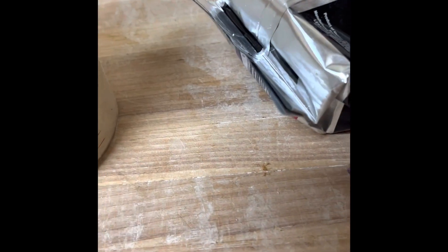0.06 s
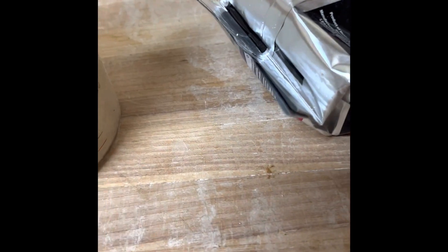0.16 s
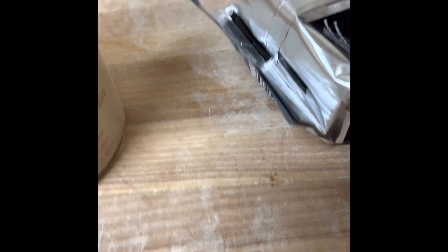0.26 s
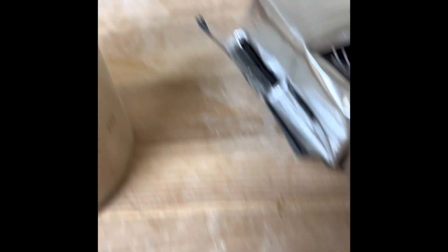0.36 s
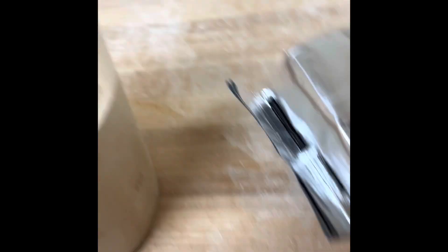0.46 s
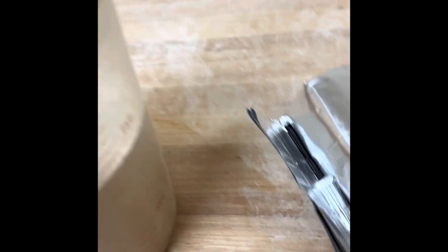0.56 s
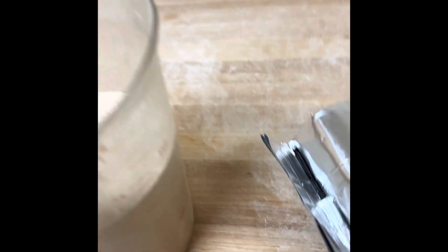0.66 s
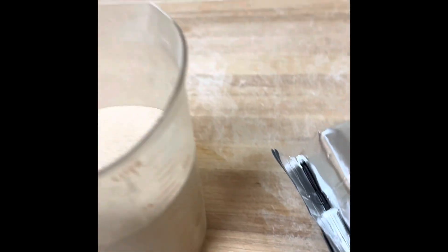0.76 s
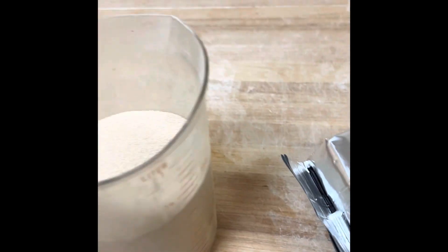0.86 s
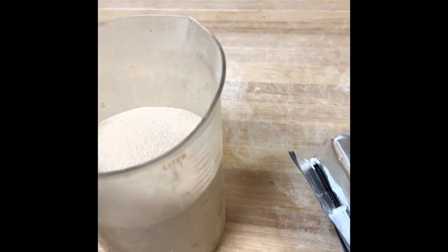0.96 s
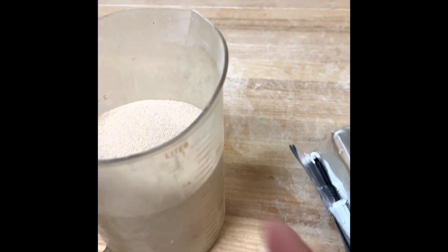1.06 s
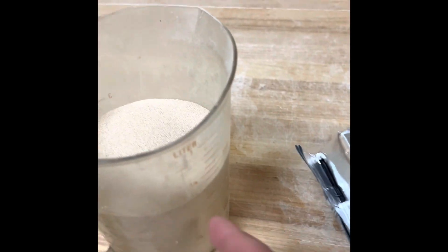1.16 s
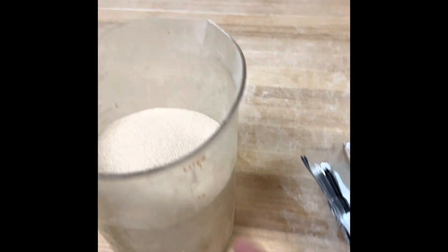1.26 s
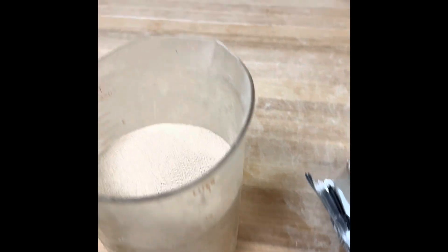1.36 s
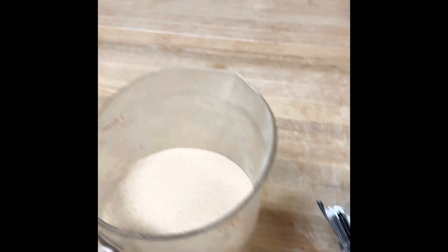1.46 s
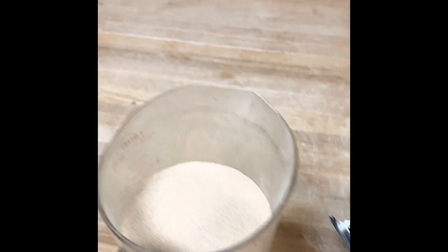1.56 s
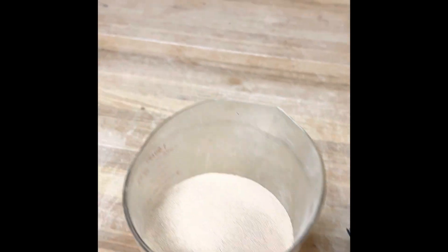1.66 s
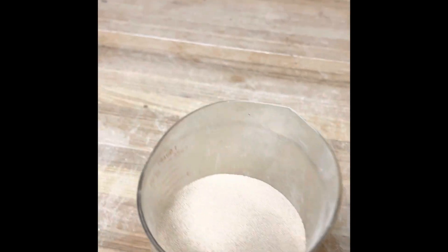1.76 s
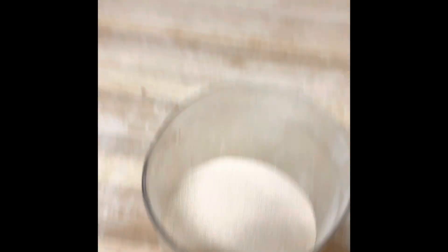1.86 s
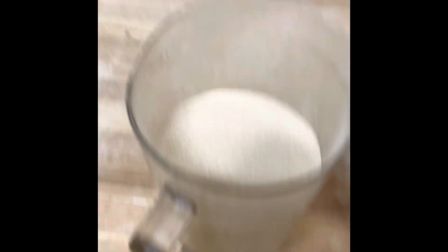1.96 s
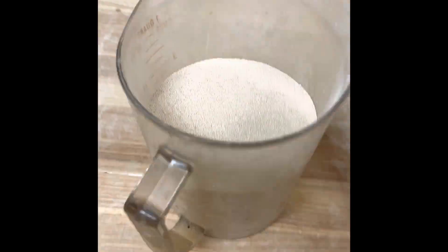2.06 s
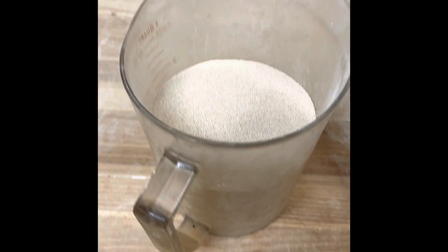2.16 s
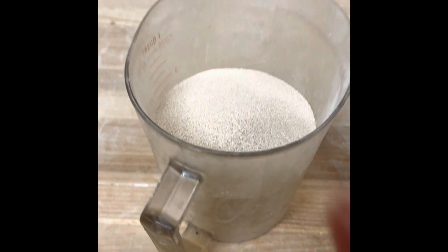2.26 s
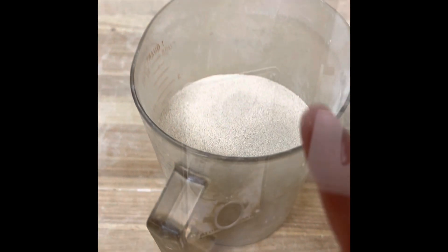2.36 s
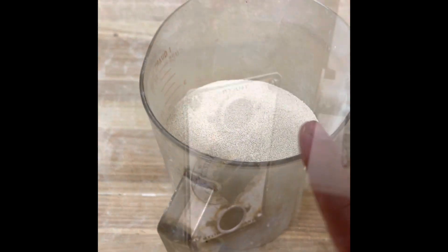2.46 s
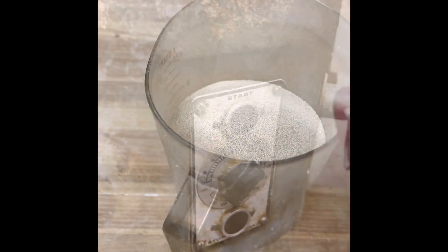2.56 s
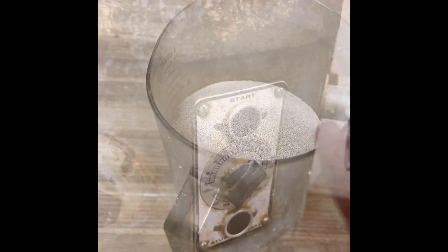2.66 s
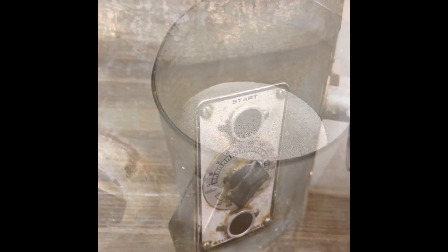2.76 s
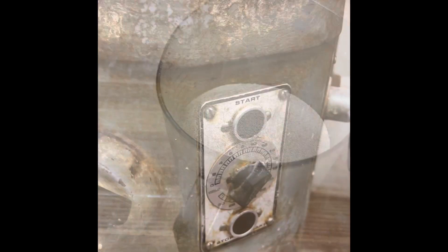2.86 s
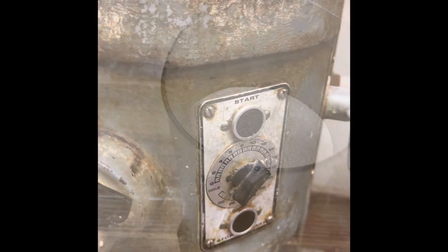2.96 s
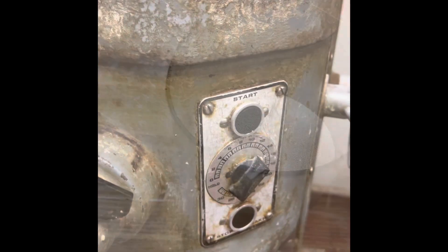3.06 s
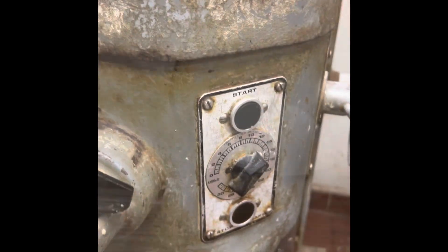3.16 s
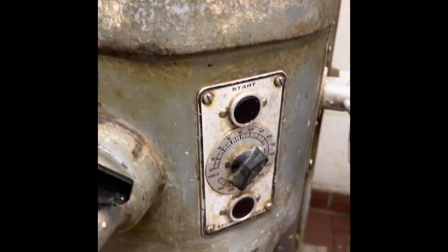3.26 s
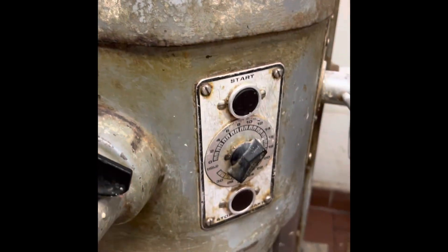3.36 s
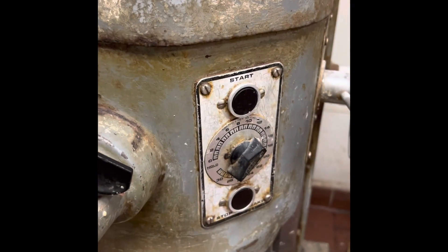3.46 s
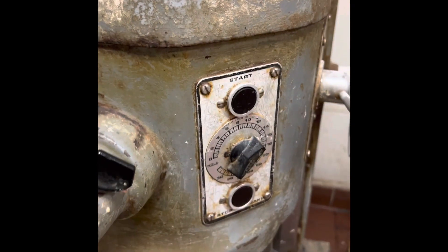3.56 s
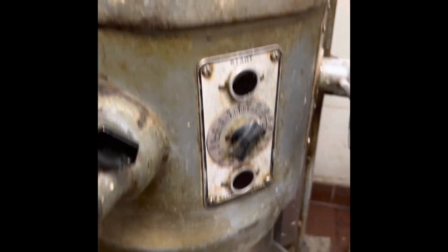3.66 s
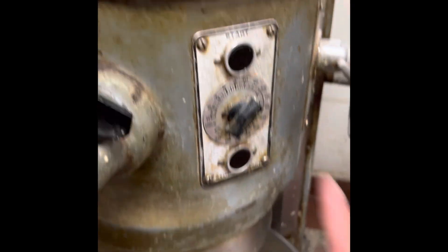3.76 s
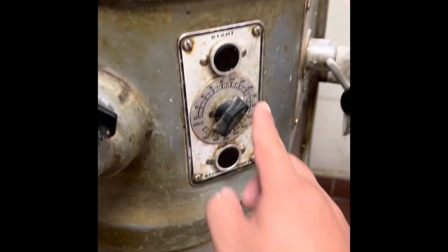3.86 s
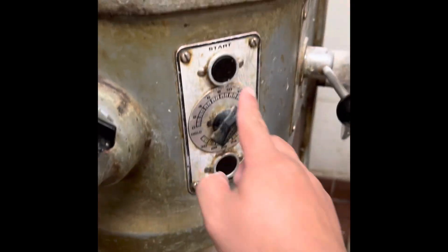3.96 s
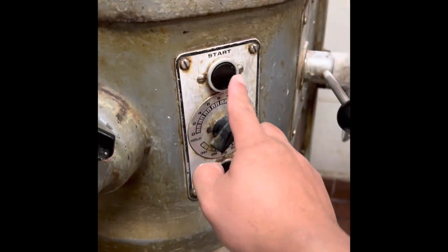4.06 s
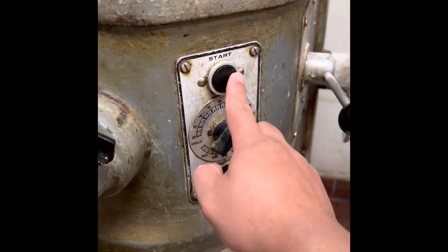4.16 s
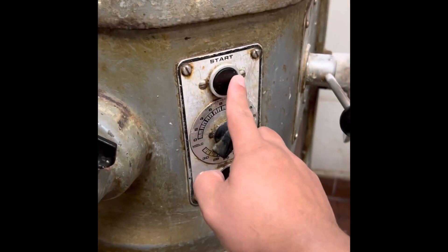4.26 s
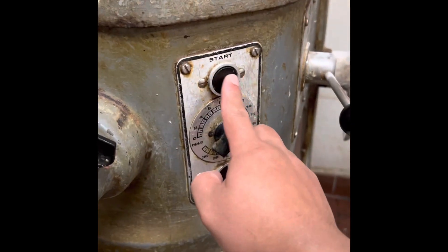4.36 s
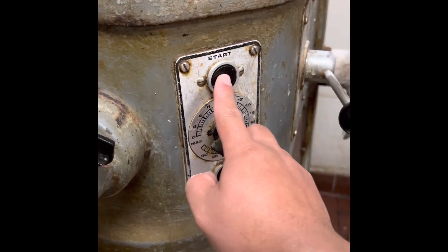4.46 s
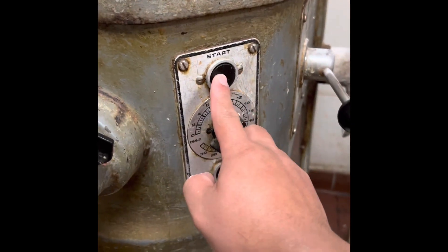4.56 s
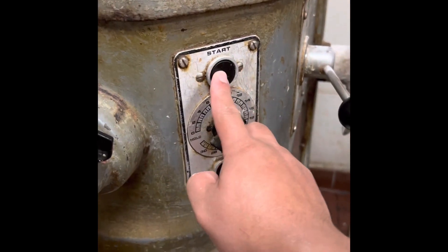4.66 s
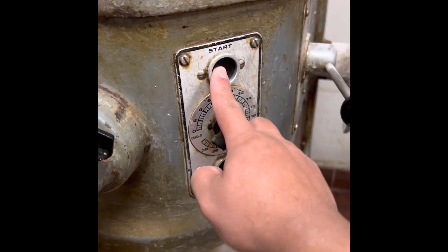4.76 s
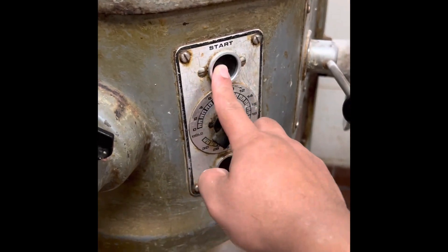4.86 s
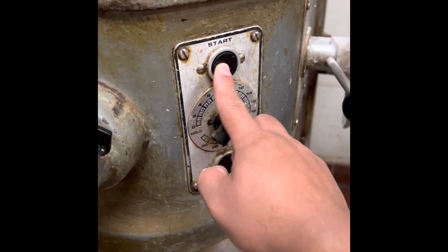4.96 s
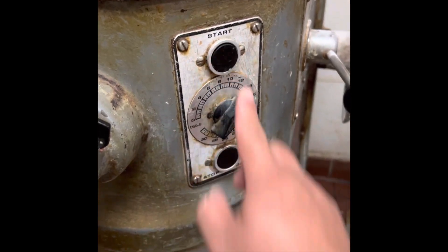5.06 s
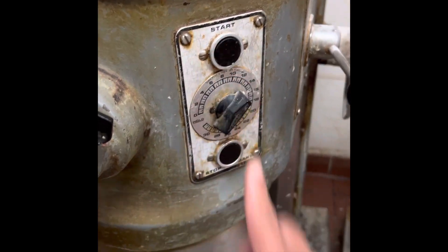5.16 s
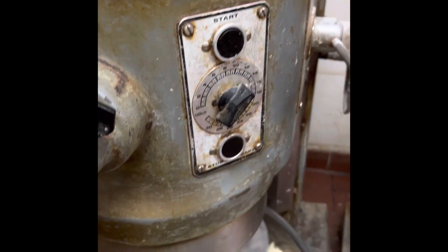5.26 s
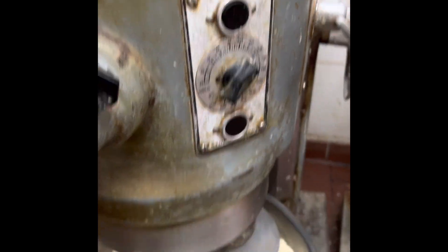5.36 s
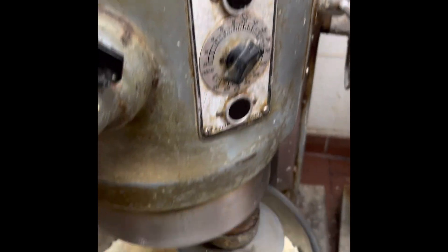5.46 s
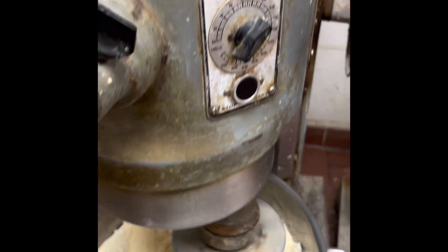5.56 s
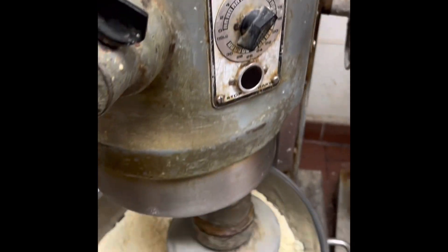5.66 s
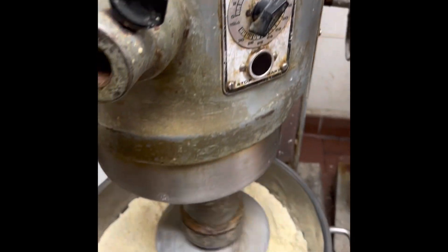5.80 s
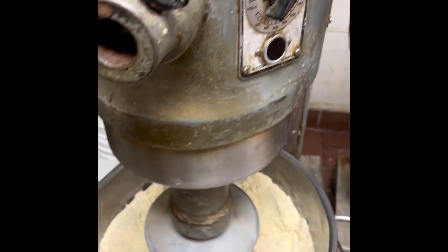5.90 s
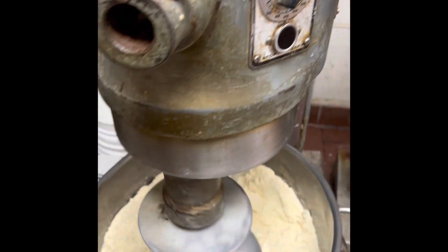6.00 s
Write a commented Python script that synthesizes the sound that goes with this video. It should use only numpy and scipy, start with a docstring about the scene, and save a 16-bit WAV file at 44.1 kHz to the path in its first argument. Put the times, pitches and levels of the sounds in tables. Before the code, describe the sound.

A quiet, steady hum of kitchen appliances and vent air carries one light wooden knock, very faint high squeaks and some far ticks. Then, close by, a start button is pressed and a big dough mixer cracks on, steel against steel. The motor surges with a ringing shudder, a switch clicks, and the gears ease into a rumble that swells with each turn of the beater.

```python
"""A bakery kitchen hums with fridges and fans, first heard at a wooden counter that takes one knock.
Thin squeaks and distant ticks pass as the sound fades to a place beside a large floor mixer.
A finger presses the start button: the contactor cracks and the motor shudders up to speed while
the resonances of the cast frame ring. The starting switch clicks, and the gears settle to a rumble
that heaves with each turn of the beater."""
import sys
import numpy as np
from scipy import signal
from scipy.fft import rfft, irfft, next_fast_len
from scipy.io import wavfile
from scipy.ndimage import uniform_filter1d

SR = 44100
rng = np.random.default_rng(int(sys.argv[2]) if len(sys.argv) > 2 else 0)


def materialize(psi):
    """Save the field psi as 16-bit PCM at rate SR to the path in sys.argv[1].

    A 1-D psi becomes a single channel; in a 2-D psi each row is a channel.
    """
    bounded = np.clip(np.atleast_2d(psi).T, -1, 1)
    quanta = np.round(bounded * 32767).astype(np.int16)
    wavfile.write(sys.argv[1], SR, quanta)


N = 265905
T = np.arange(N) / SR


def amp(db):
    """Decibels to gain."""
    return 10 ** (np.asarray(db) / 20)

def unit_rms(x):
    """Scales to rms 1."""
    return x / np.sqrt(np.mean(x ** 2) + 1e-20)

def curve(points, hz):
    """Reads a table on a log-frequency axis."""
    f, value = np.transpose(points)
    return np.interp(np.log(hz + 1), np.log(f + 1), value)

def add(mix, s, sound):
    """Mixes a sound in at s seconds."""
    part = mix[:, round(s * SR):][:, :sound.shape[1]]
    part += sound[:, :part.shape[1]]

def wander(t, top_hz):
    """Random drift of rms about 1: twelve sines up to top_hz."""
    hz, phase = np.geomspace(top_hz / 12, top_hz, num=12), rng.random(12)
    knots = np.arange(t[0], t[-1] + .01, .005)
    drift = np.sin(2 * np.pi * (knots[:, None] * hz + phase)).sum(1) / np.sqrt(6)
    return np.interp(t, knots, drift)

def noise(size, spectrum, patchy_db=0., frame=1024):
    """Two unrelated noises of one colour, rms 1, with drifting louder and softer patches."""
    re, im, patches = rng.standard_normal((3, 2, frame // 2 + 1, 4 * size // frame + 5))
    patches = uniform_filter1d(patches[0], 8, 0)
    patches = unit_rms(uniform_filter1d(patches, 12288 // frame, 1))
    colour_db = curve(spectrum, np.fft.rfftfreq(frame, 1 / SR))[:, None]
    bins = (re + 1j * im) * amp(colour_db + patchy_db * patches)
    return unit_rms(signal.istft(bins, nperseg=frame, noverlap=3 * frame // 4)[1][:, :size])

def band(size, hz, width):
    """Two unrelated noises ringing in one resonance, steady or moving."""
    pole = np.exp(-np.pi * width / SR)
    white = rng.standard_normal((2, 2, size + 4000))
    re, im = signal.lfilter([1], [1, -2 * pole, pole * pole], white)[..., 4000:]
    phase = 2 * np.pi * np.cumsum(hz * np.ones(size)) / SR
    return unit_rms(re * np.cos(phase) + im * np.sin(phase))

def tone(t, hz, db, slip):
    """A sine and cosine whose phase drifts by about slip radians."""
    phase = 2 * np.pi * (hz * t + rng.random()) + slip * wander(t, 4.)
    return np.sqrt(2) * amp(db) * np.array([np.sin(phase), np.cos(phase)])

def burst(db, hz, t60, width):
    """A short hit of pitched noise; the higher it is, the brighter its edge."""
    t = np.arange(SR // 8) / SR
    edge = amp(-24) * hz / 4000 * np.diff(rng.standard_normal((2, len(t) + 1)))
    envelope = amp(db - 60 * t / t60) * (1 - np.exp(-t / .00055))
    return envelope * (band(len(t), hz, width) + edge)

def bell(x, centre, width):
    """A Gaussian hump of height 1."""
    return np.exp(-((x - centre) / width) ** 2 / 2)

def swell(t, peak_s, rise, t60):
    """A bell-shaped rise to the peak, then free ringing."""
    return np.where(t < peak_s, bell(t, peak_s, rise), amp(-60 * np.maximum(t - peak_s, 0) / t60))


# Room tone at the counter and by the mixer (frequency [Hz], relative density [dB])
COUNTER_AIR = [(15, -45), (30, -26.5), (55, -8), (90, -6), (118, -2.5), (150, -5.5), (195, -10.5),
               (240, -4), (300, -9.5), (335, -16), (430, -10.5), (520, -19.5), (750, -23.5), (1050, -31),
               (1400, -32), (2400, -91.5)]
MIXER_SIDE_AIR = [(15, -37), (30, -18.5), (50, -9.5), (85, -8.5), (128, -0.5), (185, -5.5), (260, -3),
                  (320, -9), (420, -10), (600, -17), (830, -18), (1000, -26.5), (1400, -27), (2400, -90)]
def room_tone(near):
    """The low bed of air and machines; near is 0 at the counter and 1 by the mixer."""
    counter = amp(-45) * noise(N, COUNTER_AIR, patchy_db=.8, frame=4096)
    by_mixer = amp(-46.5) * noise(N, MIXER_SIDE_AIR, patchy_db=2.2, frame=4096)
    return (1 - near) * counter + near * by_mixer

# Fader moves of two fans (time [s], lower fan level [dB], upper fan level [dB])
FAN_LEVELS = [(0.0, -78, -80), (0.7, -74, -74), (1.3, -69, -64), (2.45, -65, -60.5), (2.68, -74, -73),
              (2.85, -62, -65), (3.27, -58.5, -57), (4.2, -61, -61), (4.7, -57, -58)]
def beating_fans():
    """Two fan tones, close in pitch, beat against each other."""
    times, lower_db, upper_db = np.transpose(FAN_LEVELS)
    lower = tone(T, hz=826, db=np.interp(T, times, lower_db), slip=.3)
    upper = tone(T, hz=846, db=np.interp(T, times, upper_db), slip=.3)
    return lower + upper

# Broad humps of the vent hiss (frequency [Hz], relative density [dB])
VENT_COLOUR = [(650, -33.5), (1100, -10), (1470, -10.5), (1590, -3.5), (1690, -5), (2340, -7), (2910, -6),
               (3800, -12), (4440, -10.5), (5790, -19), (6540, -10.5), (9110, -29), (10900, -34),
               (12600, -26), (15500, -50.5)]
def vent_hiss(near):
    """Air hisses from a vent, a little louder by the mixer."""
    level = np.hypot((1 - near) * amp(-64.5), near * amp(-62.8))
    return level * noise(N, VENT_COLOUR, patchy_db=.9)

# Hum partials (pitch [Hz], level at the counter [dB], level by the mixer [dB], waver [dB])
HUM_PARTIALS = [(119.6, -51, -58.5, 3.5), (169.1, -42.5, -53.5, 1), (214, -53.5, -57, 1.5),
                (294, -58, -56, 3.5), (356.6, -61, -66.5, 3.5), (445, -66, -71, 4), (569, -67.5, -74.5, 7),
                (672, -74, -71, -2), (964.9, -73.5, -85, 6), (1138, -80.5, -74.5, 4),
                (1534, -78.5, -81, -4.5), (1587, -88, -72, 5), (1850, -78.5, -85, 4.5),
                (2882, -78, -78, -1), (2968, -85, -74, 5), (3140, -80.5, -84, -3), (3323, -80.5, -80, 6),
                (4450, -90, -81, 3), (5300, -88, -82.5, 3), (6280, -79.5, -80, 2), (6840, -86.5, -86, 6.5),
                (7640, -93.5, -91, 1.5)]
def appliance_hum(near):
    """Fridges and fans hold wavering tones; the higher ones blur into fuzz."""
    out = np.zeros((2, N))
    for hz, counter_db, near_db, waver_db in HUM_PARTIALS:
        level = np.hypot((1 - near) * amp(counter_db), near * amp(near_db))
        fuzz = np.clip(hz / 9000, 0, .3)
        clean = tone(T, hz, waver_db * np.tanh(wander(T, 5.)), slip=.33 + hz / 900)
        out += level * (np.sqrt(1 - fuzz) * clean + np.sqrt(fuzz) * band(N, hz, hz / 150))
    return out

# Soft rustles (start [s], length [s], level [dB], pitch [Hz], width [Hz])
SOFT_RUSTLES = [(.64, .13, -75, 11000, 9000), (3.17, .4, -71, 4400, 900)]
def rustles():
    """High noise flutters in and out."""
    out = np.zeros((2, N))
    for s, length, db, hz, width in SOFT_RUSTLES:
        t = np.arange(0, length, 1 / SR)
        envelope = amp(db + 3.5 * wander(t, 40.)) * np.hanning(len(t))
        add(out, s, envelope * band(len(t), hz, width))
    return out

# Thin squeaks (start [s], length [s], first pitch [Hz], last pitch [Hz], arch [Hz], level [dB])
THIN_SQUEAKS = [(1.37, .115, 11400, 11950, 650, -82), (1.55, .055, 12200, 12700, 100, -71),
                (1.66, .13, 11450, 11750, 680, -69), (3.0, .06, 12600, 12500, 60, -71),
                (3.285, .08, 12200, 12100, 40, -73), (3.36, .09, 12300, 13000, 120, -71)]
def squeaks():
    """Very high sines glide along an arch, loudest in the middle."""
    out = np.zeros((2, N))
    for s, length, first_hz, last_hz, arch_hz, db in THIN_SQUEAKS:
        t = np.arange(0, length, 1 / SR)
        arch = np.sin(np.pi * t / length)
        hz = first_hz + (last_hz - first_hz) * t / length + arch_hz * arch
        cycles = np.cumsum(hz) / SR + .2 * wander(t, 90.)
        envelope = amp(db - 16 * (1 - arch)) * signal.windows.tukey(len(t), .3)
        squeak = envelope * np.sin(2 * np.pi * cycles)
        add(out, s, np.array([squeak, squeak]))
    return out

# Distant ticks (time [s], level [dB], pitch [Hz])
FAR_TICKS = [(2.417, -49, 4140), (2.427, -63, 3960), (2.472, -54.5, 4100), (2.492, -64, 4180),
             (2.604, -60, 4120), (2.661, -50.5, 4100)]
def ticks():
    """Each tick rings briefly under a shorter, softer overtone."""
    out = np.zeros((2, N))
    for s, db, hz in FAR_TICKS:
        add(out, s, burst(db, hz, t60=.06, width=350))
        add(out, s, burst(db - 11, 1.43 * hz, t60=.03, width=350))
    return out

# Modes of the wooden counter (level [dB], pitch [Hz], t60 [s], width [Hz])
WOOD_MODES = [(-44, 431, .1, 200), (-47, 875, .12, 89), (-49, 1400, .058, 800)]
def counter_knock(at_s=.825):
    """One knock sets the damped modes of the wood ringing."""
    out = np.zeros((2, N))
    for mode in WOOD_MODES:
        add(out, at_s, burst(*mode))
    return out

# Clicks of the start button (time [s], level [dB], pitch [Hz], width [Hz])
BUTTON_CLICKS = [(4.14, -60, 5500, 900), (4.657, -42, 1680, 2500), (4.701, -46.5, 4600, 900),
                 (4.712, -56, 4540, 900), (4.722, -39, 2960, 5000), (4.728, -32.5, 1770, 2500),
                 (4.734, -32.5, 2310, 5000)]
def start_button():
    """A finger touches the button, then pushes it home."""
    out = np.zeros((2, N))
    for s, db, hz, width in BUTTON_CLICKS:
        add(out, s, burst(db, hz, t60=.035, width=width))
    return out

# Reverb time of the kitchen (frequency [Hz], t60 [s])
ROOM_DECAY = [(1000, 0.86), (3000, 1.08), (8000, 0.7), (15000, 0.43)]
def room_tail(colour):
    """One second of noise reverb; the room keeps each band for its own time."""
    hz, times, bins = signal.stft(noise(SR, colour), SR, nperseg=256)
    decay = amp(-60 * times / curve(ROOM_DECAY, hz)[:, None])
    return signal.istft(bins * decay, SR, nperseg=256)[1][:, :SR]

# One contactor hit, then three of the switch (time [s], level [dB], t60 [s], reverb send [dB])
METAL_HITS = [(4.7457, -13, 0.17, -18), (4.955, -48, .04, -20), (4.986, -36, 0.18, -14),
              (5.008, -42, .12, -16)]
# Colours of those hits (frequency [Hz], relative density [dB])
CONTACTOR_COLOUR = [(410, -38), (700, -6.5), (961, -13), (1360, -16.5), (1720, -1.5), (1840, -7),
                    (2690, -4), (3030, -11), (4000, -7), (4390, -10), (7160, -5), (10400, -12),
                    (14200, -14.5), (15800, -20), (16500, -39)]
SWITCH_COLOUR = [(1530, -26), (2600, 0), (3290, -14), (3580, -11), (3860, -9), (6780, -14), (8010, -2),
                 (8780, -15), (12400, -13.5), (16000, -26)]
# Ringing steel of the contactor (pitch [Hz], level [dB], t60 [s])
STEEL_MODES = [(2140, -36, .3), (3890, -37, .3), (4950, -39, .3), (6680, -39, .25), (6990, -39, .25),
               (7540, -37, .25)]
def contactor_and_switch():
    """Steel slams on steel as the contactor closes; then the starting switch lets go."""
    out, t = np.zeros((2, N)), np.arange(SR) / SR
    snap = (1 - np.exp(-t / .0007)) * (1 + .86 * np.exp(-t / .0015))
    for (s, db, t60, send_db), colour in zip(METAL_HITS, [CONTACTOR_COLOUR] + 3 * [SWITCH_COLOUR]):
        slam = noise(SR, colour)
        slam[1] *= .55  # less side signal: the direct sound comes from one spot
        add(out, s, amp(db - 60 * t / t60) * snap * slam)
        add(out, s, amp(db + send_db) * (1 - np.exp(-t / .0033)) * room_tail(colour))
    for hz, db, t60 in STEEL_MODES:
        add(out, METAL_HITS[0][0], tone(t, hz, db - 60 * t / t60, slip=.8))
    return out

# Sub-bass jolts (centre time [s], mid level [dB], pitch [Hz])
FLOOR_JOLTS = [(4.845, -40.5, 40), (4.975, -42.5, 45)]
def floor_jolts():
    """The machine rocks on the floor: short, wide thumps, stronger in the side signal."""
    out = np.zeros((2, N))
    for s, db, hz in FLOOR_JOLTS:
        t = np.arange(0, 1.7 / hz, 1 / SR)
        jolt = amp(db) * np.sin(2 * np.pi * hz * t) * np.hanning(len(t))
        add(out, s - t[-1] / 2, np.array([jolt, 2.5 * jolt]))
    return out

# Knocks in the gears (time [s], level [dB], pitch [Hz])
TOOTH_KNOCKS = [(5.169, -39, 1370), (5.1981, -42, 1770), (5.231, -42, 1780), (5.7059, -39, 1770),
                (5.736, -35, 1815), (5.7494, -46, 1920), (5.8012, -39, 1800), (5.8794, -52, 1430)]
def gear_knocks():
    """Loose gear teeth knock at uneven moments."""
    out = np.zeros((2, N))
    for s, db, hz in TOOTH_KNOCKS:
        add(out, s, burst(db, hz, t60=.04, width=800))
    return out

# Air from the mixer's fan (frequency [Hz], relative density [dB])
FAN_COLOUR = [(1410, -40), (2400, -12), (2590, -1.5), (2940, -12.5), (3280, -5), (3660, -9.5),
              (7100, -18.5), (10900, -28.5), (13900, -29), (15500, -39)]
def mixer_fan(t):
    """The fan lays a bright rush of air over the machine."""
    return amp(-56) * noise(len(t), FAN_COLOUR, patchy_db=1.5)

# Gear mesh at full speed (pitch [Hz], width [Hz], relative level [dB])
MESH_BANDS = [(697, 8.6, -4.5), (828, 12, -5), (962, 14, -10), (1515, 6.5, -16.5), (1810, 12, -14),
              (2660, 30, -14.5)]
def gear_whine(t, heave):
    """Meshing teeth sing in narrow bands that swell with the beater."""
    whine = sum(amp(db) * band(len(t), hz, width) for hz, width, db in MESH_BANDS)
    return amp(-44.5 + 2.4 * heave) * whine

def gear_climb(t, from_s=4.799, to_s=5.03, hz_per_s=2750):
    """A gear tone climbs with the speed, loudest where it meets a frame resonance."""
    hz = 465 + hz_per_s * (np.clip(t, from_s, to_s) - from_s)
    gate = np.clip(np.minimum(t - from_s, to_s - t) / .015 + 1, 0, 1)
    db = -35 + 8 * bell(hz, centre=880, width=100)
    return gate * amp(db) * band(len(t), hz, width=130)

# Low resonances of the bowl (pitch [Hz], width [Hz], relative level [dB])
BOWL_BANDS = [(96.7, 17, -7.5), (121.3, 23, -5), (147.1, 10.8, 0), (177.5, 14, -3), (221, 17, -7.5)]
# Booms of the bowl (time [s], level [dB])
BOWL_BOOMS = [(4.968, -31), (5.07, -30), (5.22, -34)]
def bowl_drone(t, heave, from_s=4.94):
    """The bowl booms as the speed settles, and drones on with the beater."""
    level = np.clip((t - from_s) / .019, 0, 1) * amp(-38.5 + 3.5 * heave)
    for s, db in BOWL_BOOMS:
        level = np.hypot(level, amp(db) * swell(t, s, rise=.012, t60=.25))
    return level * unit_rms(sum(amp(db) * band(len(t), hz, width) for hz, width, db in BOWL_BANDS))

# Body of the gear noise (frequency [Hz], relative density [dB])
RUMBLE_COLOUR = [(120, -41.5), (200, -9), (260, -4), (318, -12.5), (369, -5.5), (506, -16), (762, -13.5),
                 (834, -11), (913, -17.5), (1860, -28), (2290, -27), (2590, -26), (3000, -34.5),
                 (3900, -60), (6600, -120)]
def gear_rumble(t, at_speed_s, heave):
    """The gears bite as they take up the load, then ease to a steady rumble."""
    run_up_db = 14.5 * np.exp(-at_speed_s / .08)
    bite_db = 7 * bell(t, centre=4.83, width=.03)
    return amp(-41.5 + run_up_db + bite_db + 2.6 * heave) * noise(len(t), RUMBLE_COLOUR, patchy_db=1.5)

# Modes of the cast frame (pitch [Hz], peak time [s], peak level [dB], rise [s], t60 [s],
# held level relative to the strain [dB], noise width [units of 2.73 Hz])
FRAME_MODES = [(168, 4.78, -28, .02, .6, -30, 12), (254.8, 4.812, -12.5, 0.027, .35, 2, 20),
               (311, 4.825, -12, .022, 0.47, -12.5, 14.6), (337, 4.85, -12, 0.035, .32, -6.5, 5.9),
               (360.5, 4.875, -16.5, 0.016, 0.47, -1, 10), (387.7, 4.905, -19.5, 0.037, 0.31, -3, 17),
               (457.5, 4.78, -27, 0.012, 0.1, -21, 14), (539, 4.87, -32, .03, 0.22, -13.5, 12),
               (628, 4.93, -29, .04, 0.25, -11.5, 10), (698, 4.825, -30, 0.025, .3, -11.5, 24),
               (834, 4.958, -22.5, 0.026, .25, -16.5, 17), (880, 5.025, -28, 0.042, 0.35, -20, 17.5),
               (963, 4.82, -36, 0.02, .25, -19, 25), (1005, 4.98, -33, .03, 0.3, -15, 26),
               (1089, 5.01, -43, 0.015, 0.18, -19, 27), (1536, 4.85, -41, 0.044, .3, -25.5, 13),
               (1730, 4.77, -33, 0.012, 0.27, -27, 22), (1815, 4.99, -30.5, 0.027, 0.37, -25, 41),
               (1934, 4.83, -42, .03, .3, -19.5, 25), (2070, 4.86, -35.5, .04, 0.59, -32, 25),
               (2576, 4.83, -38, 0.055, 0.25, -25.5, 38)]
def frame_shudder(t, at_speed_s, heave):
    """Each mode swells at its own set moment during start-up, then sings on as the strain relaxes."""
    strain_db = -44.5 + 18 * np.exp(-at_speed_s / .11) + 1.2 * heave
    out = np.zeros((2, len(t)))
    for hz, peak_s, db, rise, t60, held_db, width in FRAME_MODES:
        rough = np.clip((hz - 380) / 450, .05, .75)  # higher modes shake unevenly
        ring = np.sqrt(1 - rough) * tone(t, hz, 0, slip=.79)
        ring += np.sqrt(rough) * band(len(t), hz, 2.73 * width)
        level = np.hypot(amp(db) * swell(t, peak_s, rise, t60), amp(strain_db + held_db))
        out += level * ring
    return out

def mixer(start_s=4.75, full_speed_s=5.02, turn_s=.4, heave_peak_s=5.82):
    """The motor drives frame, gears, bowl and fan; the beater heaves the flour once a turn."""
    t = T[T >= start_s]
    at_speed_s = np.maximum(t - full_speed_s, 0)
    settled = np.clip(at_speed_s / .19, 0, 1)
    heave = settled * np.cos(2 * np.pi * (t - heave_peak_s) / turn_s)
    running = settled * (mixer_fan(t) + gear_whine(t, heave))
    running += gear_climb(t) + bowl_drone(t, heave)
    running += gear_rumble(t, at_speed_s, heave) + frame_shudder(t, at_speed_s, heave)
    attack = 1 - np.exp(-(t - t[0]) / .011)
    out = floor_jolts() + gear_knocks()
    add(out, t[0], attack * running)
    return out

# Phase between the channels (frequency [Hz], left lead [rad])
LEFT_LEAD = [(0, 0.055), (2070, 0.0088), (2760, -1.8), (3960, -0.84), (9470, -0.8), (12700, -1.4),
             (16200, -0.9)]
def stereo(layer, coherence, balance):
    """Spreads a layer's two signals, as mid and side, over a microphone pair."""
    size = next_fast_len(N, True)
    hz = np.fft.rfftfreq(size, 1 / SR)
    alike = np.clip(curve(coherence, hz), 0, 1)
    mid, side = rfft(layer, size) * np.sqrt([(1 + alike) / 2, (1 - alike) / 2])
    pan = amp(curve(balance, hz) / 2) * np.exp(.5j * curve(LEFT_LEAD, hz))
    return irfft(np.array([(mid + side) * pan, (mid - side) / pan]), size)[:, :N]

# Stereo likeness of each layer (frequency [Hz], coherence [0-1])
KITCHEN_COHERENCE = [(30, 0.88), (60, 0.96), (130, 0.99), (290, 0.98), (640, 0.17), (1410, 0.47),
                     (3100, 0.08), (6820, 0.22), (15000, 0.1)]
MACHINE_COHERENCE = [(60, 0.93), (130, 1), (290, 1), (640, 0.28), (1410, 0.7), (3100, 1), (6820, 0.25),
                     (15000, 0.1)]
# Pan of each layer (frequency [Hz], left minus right [dB])
KITCHEN_BALANCE = [(60, 0.5), (150, 0.77), (380, 2.4), (950, 1.2), (2380, 0.5), (5980, 0), (15000, 0.0)]
MACHINE_BALANCE = [(60, -1), (130, 0.5), (290, 3), (640, -3), (1410, -0.5), (3100, 1), (6820, 0.5),
                   (15000, -0.5)]
def scene(move_from_s=2.32, move_to_s=3.19):
    """The kitchen bed crossfades from counter to mixer; the machine has its own stereo spread."""
    near = np.clip((T - move_from_s) / (move_to_s - move_from_s), 0, 1)
    kitchen = room_tone(near) + beating_fans() + vent_hiss(near) + appliance_hum(near)
    kitchen += rustles() + squeaks() + ticks() + counter_knock() + start_button()
    machine = contactor_and_switch() + mixer()
    background = stereo(kitchen, KITCHEN_COHERENCE, KITCHEN_BALANCE)
    return background + stereo(machine, MACHINE_COHERENCE, MACHINE_BALANCE)

def record(dry):
    """The input stage rounds off the loudest peaks; a low-pass trims the very top."""
    ceiling, cutoff_hz = .95, 16500
    soft = dry / (1 + (dry / ceiling) ** 4) ** .25
    low_pass = signal.firwin(511, cutoff_hz, window=("kaiser", 9), fs=SR)
    return signal.oaconvolve(soft, low_pass[None], "same")


dry = scene()
out = record(dry)
materialize(out)
```